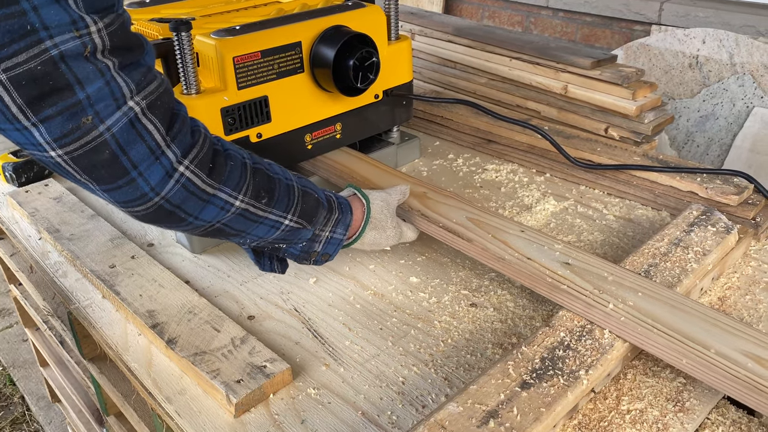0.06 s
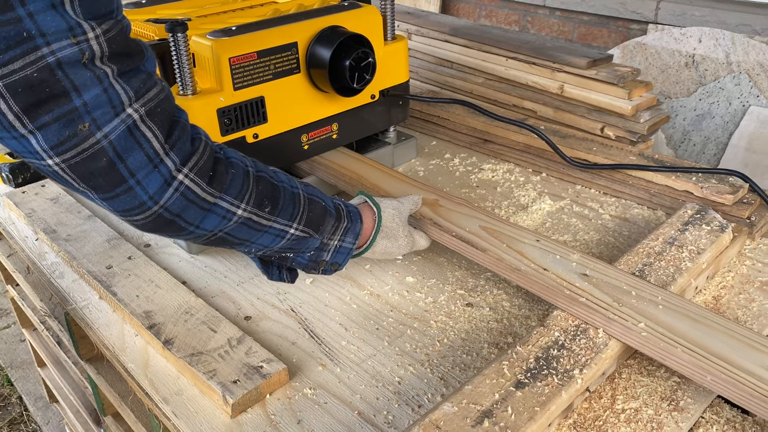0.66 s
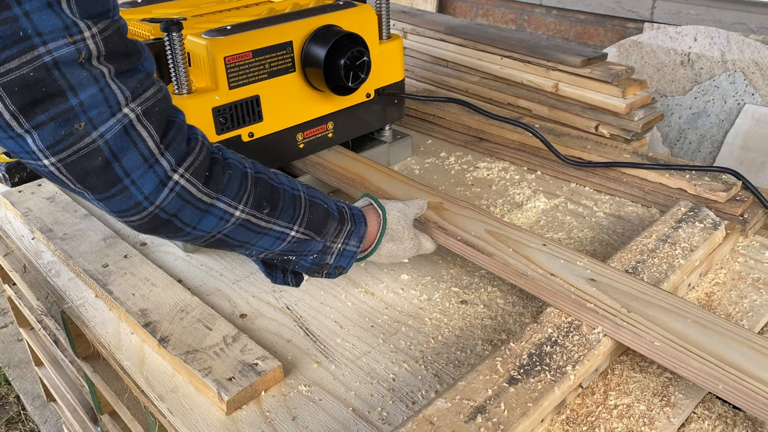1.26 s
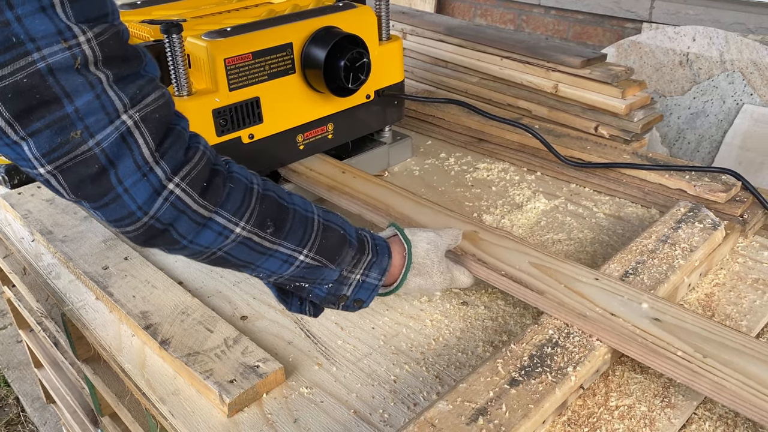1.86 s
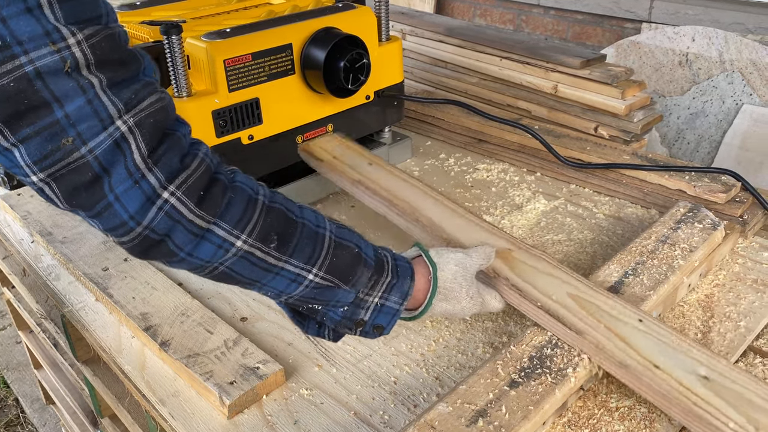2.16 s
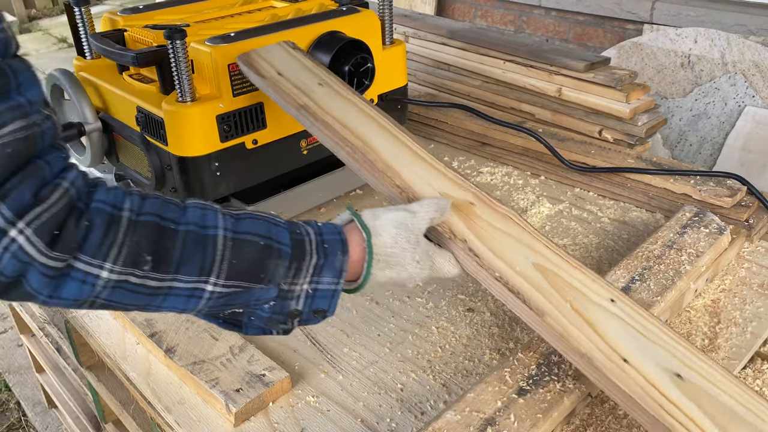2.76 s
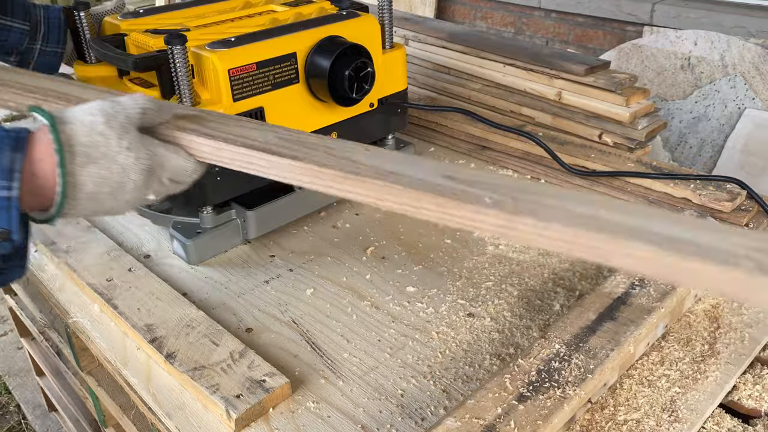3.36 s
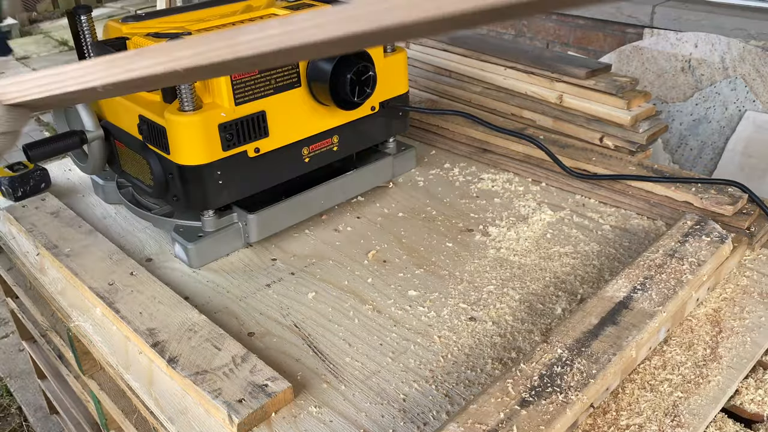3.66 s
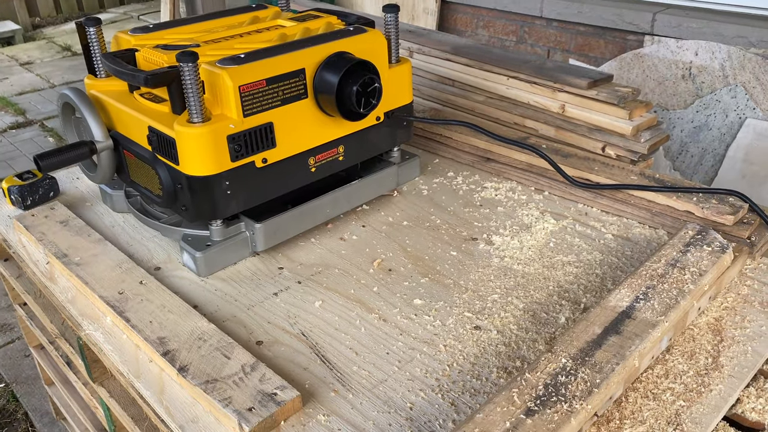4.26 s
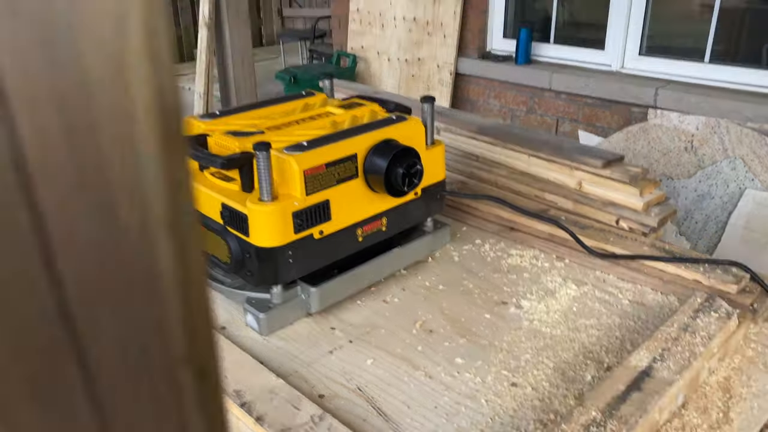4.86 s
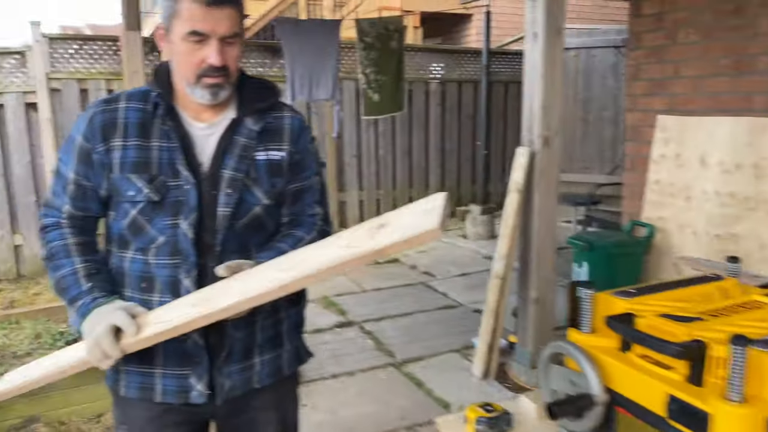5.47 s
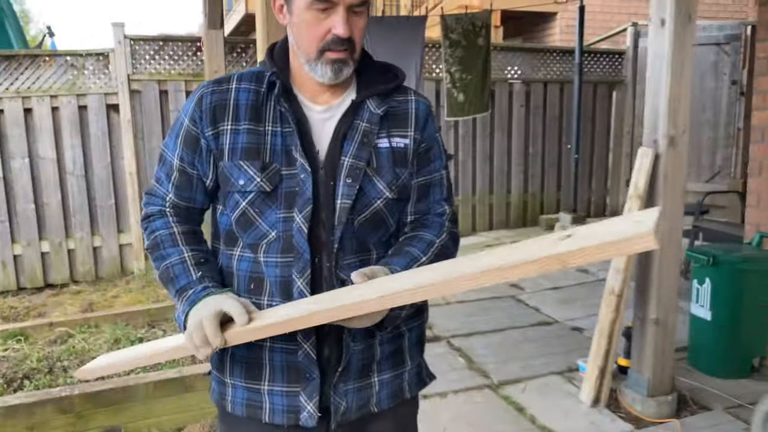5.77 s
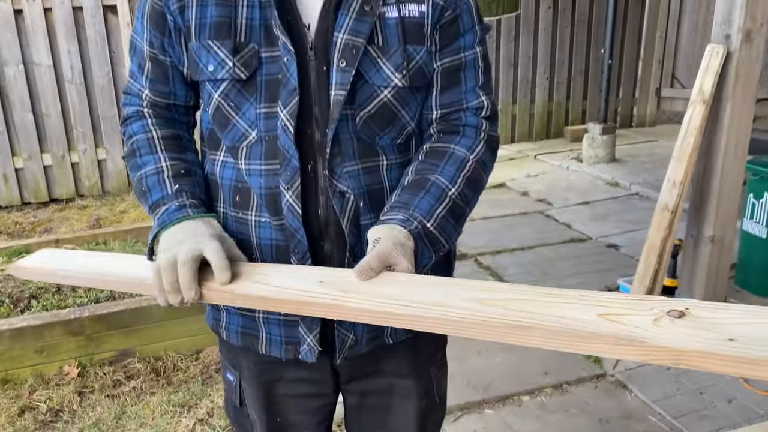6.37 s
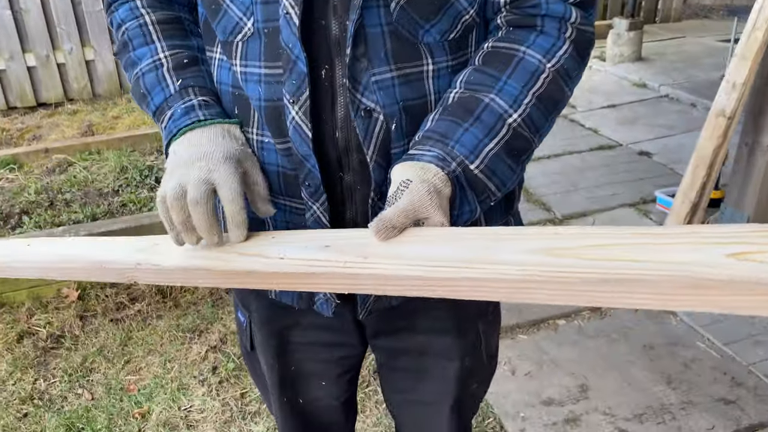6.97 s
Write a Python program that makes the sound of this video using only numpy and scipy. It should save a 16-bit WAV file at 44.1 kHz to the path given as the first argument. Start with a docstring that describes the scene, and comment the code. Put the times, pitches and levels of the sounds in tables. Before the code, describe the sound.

Close to the microphone, a thickness planer hums and whines over a loud roar of air while finishing a board, which rasps on its way out. The power is cut with a dull knock and the motor slides down in pitch over a few seconds. As it dies away the quiet yard comes through: a small bird chirping faintly, low rumble, soft bumps and light gloved touches on the board.

```python
"""A wood planer winds down

A thickness planer runs in a back yard as a board is drawn out, then is switched off and coasts to rest.
Its three-knife cutterhead drones, the belted motor and fan whine, and air roars through the ringing
housing. As it slows, the tones sink and the yard comes through: a low rumble, soft bumps, a glove
tapping and brushing the wood, and a small bird."""
import sys
import numpy as np
from scipy import signal
from scipy.fft import rfft, irfft, next_fast_len
from scipy.io import wavfile
from scipy.ndimage import map_coordinates

SR = 44100
rng = np.random.default_rng(int(sys.argv[2]) if len(sys.argv) > 2 else 0)


def file_out(sig):
    """Save sig as 16-bit WAV at sys.argv[1]."""
    # one column per channel
    cols = np.atleast_2d(sig).T
    # limit, then scale
    lim = np.clip(cols, -1, 1)
    pcm = np.round(lim * 32767).astype(np.int16)
    wavfile.write(sys.argv[1], SR, pcm)


N = 309120
TIME = np.arange(N) / SR
# Names ending in _AT are moments and those in _S are durations, both in seconds.
CUT_ENDS_AT, CUT_EASE_S = 1.3, 0.63  # the load comes off the knives
BOARD_OUT_AT, SWITCH_OFF_AT = 2.23, 3.272
TURN_AWAY_AT, TURN_S = 4.99, 0.72  # the microphone swings away from the machine
FULL_SPEED_HZ, BELT_RATIO = 140, 2.006  # cutterhead turns a second; motor turns per cutterhead turn


def amp(db):
    """Turn decibels into a gain."""
    return np.exp(np.asarray(db) * (np.log(10) / 20))

def unit(x):
    """Scale a signal to an average size (rms) of 1."""
    return x / np.sqrt(np.mean(np.abs(x) ** 2) + 1e-20)

def along(points, hz):
    """Read between (frequency, value) points, with octaves evenly spaced."""
    f, v = np.transpose(points)
    return np.interp(np.log(hz + 1), np.log(f + 1), v)

def ramp(at, length):
    """Rise from 0 to 1, passing halfway at the given moment."""
    return np.clip((TIME - at) / length + .5, 0, 1)

def swell(at, half_width):
    """Rise smoothly from 0 to 1 and back around a moment."""
    return np.exp(-((TIME - at) / half_width) ** 2)

def wobble(rate):
    """A smooth curve through `rate` random values a second."""
    coarse = np.arange(0, N + 16, 16)
    knots = rng.standard_normal(int(N * rate / SR) + 4)
    curve = map_coordinates(knots, [coarse * rate / SR], mode="nearest")
    return unit(np.interp(np.arange(N), coarse, curve))

def fuzzy(hz, width_hz):
    """A narrow band of noise around one pitch."""
    phase = 2 * np.pi * hz * TIME
    return unit(wobble(width_hz) * np.cos(phase) + wobble(width_hz) * np.sin(phase))

def filtered(x, response):
    """Scale each frequency in x by response(hz)."""
    size = next_fast_len(N + 8192)
    return irfft(rfft(x, size) * response(np.fft.rfftfreq(size, 1 / SR)), size)[..., :N]

def stereo(lean_db, lead):
    """Left and right gains: the left is lean_db louder and `lead` radians ahead."""
    half = amp(lean_db / 2) * np.exp(.5j * lead)
    return np.array([half, 1 / half]).reshape(2, -1)

def tone(cycles, rough, lean_db=0, lead=0, flutter_hz=30):
    """A stereo sine wave that moving air makes flutter."""
    flutter = rough * (wobble(flutter_hz) + 1j * wobble(flutter_hz))
    wave = unit(1 + flutter) * np.exp(2j * np.pi * (cycles + rng.random()))
    return np.sqrt(2) * np.real(wave * stereo(lean_db, lead))

LIKENESS = [(250, 0.77), (600, 0.46), (1000, 0.66), (1350, 0.28), (1700, 0.88), (2800, 0.43), (4000, 0.57),
            (6800, 1), (8200, 1), (15000, 0.062)]  # how alike left and right are: f/Hz, likeness/0-1
LEFT_LOUDER = [(100, -4.5), (500, -3), (1000, 3.5), (1250, 5.5), (1600, -1), (3400, -3), (4200, 8.5),
               (4800, 6), (7000, 1.5), (8000, 0)]  # how much louder the machine is on the left: f/Hz, level/dB
LEFT_AHEAD = [(100, -1), (420, 0.5), (550, 0.83), (1200, 1.73), (1450, 0.26), (2100, 0.62), (3200, 1.5),
              (3900, 3), (4500, 1.5), (6200, 1), (7600, 2), (8700, 4.5), (10500, 1.5), (11600, -7),
              (13000, -8.5), (15600, 5.5)]  # how far its waves are ahead on the left: f/Hz, phase/rad
def noise(spectrum, aimed=True):
    """Stereo noise shaped by a spectrum; if aimed, it comes from the machine's direction."""
    size = next_fast_len(N, real=True)
    hz = np.fft.rfftfreq(size, 1 / SR)
    alike = np.clip(along(LIKENESS, hz), 0, 1)
    mid, side = rfft(rng.standard_normal((2, size))) * np.sqrt([1 + alike, 1 - alike])
    direction = stereo(aimed * along(LEFT_LOUDER, hz), aimed * along(LEFT_AHEAD, hz))
    colour = amp(along(spectrum, hz)) * direction
    pair = irfft(np.array([mid + side, mid - side]) * colour, size)[:, :N]
    return pair / np.std(pair.mean(0))


RUMBLE_SPECTRUM = [(25, -25.5), (60, 1.5), (110, -4), (200, -12.5), (350, -19.5), (650, -21.5),
                   (940, -22.5), (1300, -27), (2000, -30), (3000, -48), (6000, -59), (12000, -62.5),
                   (16000, -76.5)]  # low outdoor rumble: f/Hz, level/dB
ROAD_SPECTRUM = [(500, -33.5), (780, -3.5), (940, 1), (1100, -9), (1300, -15.5), (1700, -16), (2600, -38.5)]  # hollow rush, like far-off tyres: f/Hz, level/dB
def yard():
    """The rumble swells as the microphone is carried round; a distant rush draws nearer."""
    rumble = amp(-59 + 8 * swell(5.43, 0.87) + 0.81 * wobble(6.8)) * noise(RUMBLE_SPECTRUM, aimed=False)
    road = amp(-72.5 + 5.5 * ramp(6.2, .9) + 1.2 * wobble(11)) * noise(ROAD_SPECTRUM, aimed=False)
    return rumble + road

# Chirps, slurs and trills: t/s, length/s, first f/Hz, last f/Hz, level/dB, trill/0-1
BIRD_NOTES = [(4.935, .035, 6200, 5840, -63, .3), (4.982, 0.04, 6380, 6560, -57, .25),
              (5.632, .024, 6250, 5400, -71.5, 0), (5.656, .024, 5340, 5650, -70.5, 0),
              (5.83, .115, 5630, 5700, -75.5, .6), (5.96, .065, 8450, 7850, -86, .5),
              (6.428, 0.02, 5950, 5470, -69, 0.1), (6.45, .026, 5500, 5780, -74, 0.05),
              (6.478, 0.121, 5860, 5830, -79, .55), (6.598, 0.17, 5800, 5850, -75, 0.8),
              (6.785, .05, 8200, 8250, -84, .1), (6.835, .04, 8300, 7800, -86, .5)]
def bird(trill_hz=112, swing_hz=110, rasp_hz=130, edge_s=.015, echo_s=.15):
    """Thin gliding notes echo off the fences; in a trill, pitch and loudness pulse unevenly."""
    beat = 2 * np.pi * np.cumsum(trill_hz * (1 + .17 * wobble(60))) / SR
    swing = swing_hz * (np.sin(beat) + wobble(900))
    rasp = rasp_hz * wobble(1200)
    song = 0
    for at, length, first_hz, last_hz, db, trill in BIRD_NOTES:
        hz = first_hz + (last_hz - first_hz) * ramp(at + length / 2, length) + trill * swing + rasp
        sounding = ramp(at, edge_s) * (1 - ramp(at + length, edge_s))
        pulses = 1 - trill * (1 + np.cos(beat)) / 2
        song += sounding * pulses * amp(db) * np.sqrt(2) * np.sin(2 * np.pi * np.cumsum(hz) / SR)
    t = TIME[:SR // 4]
    echo = rng.standard_normal((2, len(t))) * amp(-60 * t / echo_s)
    echo /= np.linalg.norm(echo[0])
    return song + amp(-7) * signal.fftconvolve(song[None], echo, axes=1)[:, :N]

# The switch, then knocks near the microphone: t/s, level/dB, f/Hz, time to fade 60 dB/s
THUDS = [(3.277, -9, 255, 0.041), (5.502, -26.5, 58, 0.14), (5.535, -30.5, 69.5, 0.3),
         (5.587, -21.5, 123, 0.049)]
def thuds(attack_s=0.01):
    """Each soft knock is one low tone that dies quickly."""
    out = 0
    for at, db, hz, fade_s in THUDS:
        t = np.maximum(TIME - at, 0)
        out += amp(db - 60 * t / fade_s) * (1 - np.exp(-t / attack_s)) * np.sin(2 * np.pi * hz * t)
    return out

GLOVE_STROKES = [(5.78, -76, .1), (6.13, -77, .22), (6.41, -71.5, 0.055), (6.6, -82, .13),
                 (6.989, -84, 0.033)]  # brushes along the board: t/s, level/dB, half width/s
GLOVE_SPECTRUM = [(500, -20.5), (1000, -0.5), (1500, 2), (2200, -10), (4000, -11), (8500, -18),
                  (12000, -23), (16000, -48)]  # cloth on wood: f/Hz, level/dB
def glove():
    """Cloth rubs the planed wood in short, scratchy strokes."""
    pressure = sum(amp(db) * swell(at, width) for at, db, width in GLOVE_STROKES)
    return pressure * amp(2.5 * wobble(150)) * noise(GLOVE_SPECTRUM, aimed=False)

FINGER_TAPS = [(6.372, -53), (6.436, -63)]  # fingers landing: t/s, relative level/dB
BOARD_NOTES = [(820, -1, .05), (1330, -4, .04), (1520, 0, .04), (1800, -5, .03), (3900, -12, .015)]  # how the board rings: f/Hz, relative level/dB, time to fade 60 dB/s
def taps(attack_s=.001):
    """Gloved fingers set the board ringing with small woody ticks."""
    out, t = np.zeros(N + SR), TIME[:SR // 8]
    for at, tap_db in FINGER_TAPS:
        ring = sum(amp(db - 60 * t / fade_s) * np.sin(2 * np.pi * (hz * t + rng.random()))
                   for hz, db, fade_s in BOARD_NOTES)
        out[round(at * SR):][:len(t)] += amp(tap_db - 3) * (1 - np.exp(-t / attack_s)) * ring
    return out[:N]

BOARD_SCRAPES = [(2.118, -42.5, 0.027), (2.298, -30, 0.05), (2.43, -36.5, .05)]  # the board's end dragging: t/s, level/dB, half width/s
SCRAPE_SPECTRUM = [(1200, -28.5), (1700, -3.5), (2100, -14.5), (2600, 1), (3250, 1), (3600, -15.5),
                   (4500, -14), (6000, -28)]  # wood on the planer's bed: f/Hz, level/dB
def scrape():
    """The board's end rasps over the bed as it comes free."""
    pressure = sum(amp(db) * swell(at, width) for at, db, width in BOARD_SCRAPES)
    grit = unit(amp(1.5 * wobble(500)))
    return pressure * grit * noise(SCRAPE_SPECTRUM)

FRAME_NOTES = [(278.7, 8, -4.5), (409.6, 8.3, -10.5), (615, 12, -17.5), (990, 130, -18)]  # how the frame rings: f/Hz, width/Hz, relative level/dB
def frame(fade_at=5.13, fade_db_per_s=14.5):
    """The frame rings on, then fades in the last turns, when a hollow note swells briefly."""
    level_db = -49.5 - fade_db_per_s * np.maximum(TIME - fade_at, 0)
    hollow = amp(-62.5) * swell(5.7, .09) * fuzzy(hz=1000, width_hz=110)
    return hollow + amp(level_db) * sum(amp(db) * fuzzy(hz, width) for hz, width, db in FRAME_NOTES)

WHIRR_SPECTRUM = [(150, -24), (250, 0), (400, -1), (530, 4.5), (660, -9), (800, 0), (1000, -23),
                  (1500, -37)]  # belt and bearings: f/Hz, level/dB
def whirr(turns):
    """The slow shafts rumble in their bearings, pulsing once a turn."""
    pulses = 1 + 0.32 * np.cos(2 * np.pi * turns)
    return amp(-55.5) * swell(5.05, 0.65) * pulses * noise(WHIRR_SPECTRUM, aimed=False)

# The air's roar, rush and hiss: base level/dB, gain with the board out/dB,
# loss per halving of the flow/dB, loss on turning away/dB
AIR_LAYERS = [(-35, 0.4, 15.5, 11), (-32, 0, 21, 8), (-35.5, 0, 30.5, 1.5)]
def air_levels(speed_hz, swirl_hz=34.8):
    """Air noise sinks with the flow, treble fastest, and drops again as the shafts stop."""
    halvings = np.log2((FULL_SPEED_HZ + swirl_hz) / (speed_hz + swirl_hz))  # some air keeps swirling
    opened, away = ramp(BOARD_OUT_AT, 0.44), ramp(TURN_AWAY_AT, TURN_S)
    rest_db = -14 * ramp(6.75, .15)
    roar_db, rush_db, hiss_db = [base_db + open_db * opened - slow_db * halvings - away_db * away + rest_db
                                 for base_db, open_db, slow_db, away_db in AIR_LAYERS]
    shade = ramp(5.09, .2) - ramp(5.39, 0.49)  # a wooden post passes in front of the microphone
    lift_db = 2.5 * swell(3.1, 0.36)  # more hiss as the board is lifted clear
    return roar_db, rush_db - 2 * shade, hiss_db + lift_db - 16.5 * shade

ROAR_SPECTRUM = [(25, -37), (60, -15.5), (110, -7), (180, -9.5), (240, -4), (350, -4.5), (490, -5.5),
                 (600, 0), (900, 1), (1200, 2), (1420, -10), (1650, -2), (2100, -15), (3000, -35.5)]  # low air noise: f/Hz, level/dB
RUSH_SPECTRUM = [(1300, -45.5), (2000, -8), (2700, 3.5), (3200, -2), (3600, 0.5), (4400, -0.5),
                 (5400, -5.5), (6700, -4.5), (7600, -8), (9000, -21), (12000, -70.5)]  # middle air noise: f/Hz, level/dB
HISS_SPECTRUM = [(4000, -33.5), (7000, 1.5), (8300, -13.5), (9500, 6), (10700, 3.5), (12000, -3.5),
                 (13300, -20.5), (14500, -19), (15700, -9), (17000, -42.5)]  # high hiss, with hollows near 8.3 and 13.3 kHz: f/Hz, level/dB
# Where the housing rings: f/Hz, width/Hz, gain with the board in/dB, gain with it out/dB
HOUSING_PEAKS = [(720, 100, -1.5, 2), (1067, 57, 3.5, 1.5), (1731, 52, -2, 9.5), (2146, 247, 14, 5),
                 (2640, 130, 4, 2.5), (2847, 67, 7, 10), (3040, 31, -2, 5), (3096, 28, -3, 7.5),
                 (3240, 85, -0.5, 11), (3530, 44, -5, -10), (3612, 55, 9, 2.5), (3690, 110, -6.5, -5),
                 (4030, 110, -1.5, 4), (4240, 36, 0.5, 4), (4620, 160, 3, -1), (5130, 47, -6, -2.5)]
def air(turns, roar_db, rush_db, hiss_db):
    """Fan and knives churn the air; the housing rings differently once the board is out."""
    angle = 2 * np.pi * turns
    puffs = 1 + 0.085 * np.cos(angle) + 0.093 * np.cos(3 * angle)  # once a turn and once a knife
    roar = amp(roar_db + 3.5 + 0.77 * wobble(12)) * puffs * noise(ROAR_SPECTRUM)
    rush = amp(rush_db - 1.0 + 0.65 * wobble(14)) * noise(RUSH_SPECTRUM)
    hiss = amp(hiss_db + 1.5 + 0.82 * wobble(15)) * noise(HISS_SPECTRUM)
    flow = roar + rush
    centre, width, blocked_db, open_db = np.transpose(HOUSING_PEAKS)
    peaks = lambda hz: 1 / (1 + (2 * (hz[:, None] - centre) / width) ** 2)
    blocked = filtered(flow, lambda hz: amp(peaks(hz) @ blocked_db))
    opened = filtered(flow, lambda hz: amp(peaks(hz) @ open_db))
    ringing = blocked + (opened - blocked) * ramp(BOARD_OUT_AT, 0.76)
    away = 0.75 * ramp(5.54, 0.39)  # the microphone swings off the housing's mouth
    return ringing + (flow - ringing) * away + hiss

CASING_GAIN = [(200, -8), (250, -4), (277, 11), (310, -4), (350, 3), (400, -4), (620, 1), (1060, 1),
               (1250, 0), (1420, -12), (1730, -3), (1920, -15), (2160, -3), (2330, -10), (2480, -2),
               (2650, 2), (2780, 2.5), (2950, -1.5), (3230, -1), (3500, -13), (3700, -6), (3950, -.5),
               (4250, 3), (4430, 0), (4680, -12), (5050, -7), (5450, -13), (5850, -8), (6250, -14),
               (6740, -7), (8000, -24)]  # how well the casing gives off sound: f/Hz, gain/dB
def casing(sound):
    """Falling pitches flare as they slide through the casing's peaks."""
    return filtered(sound, lambda hz: amp(along(CASING_GAIN, hz)))

# Noise bands: centre/cycles a turn, width/cycles a turn, powered gain/dB, coasting gain/dB
WAKE_BANDS = [(15.26, .9, -6, -11), (31.1, 2.2, -14.5, -8), (40.6, 2.4, -21.5, -7), (53, 6, -28.5, -9.5),
              (62, 4, -30, -12.5)]
def wakes(turns, coasting, rush_db, steps_per_turn=256):
    """Blades leave uneven air behind them: bands of noise that sink and narrow with the speed."""
    count = 2 ** 18
    multiples = np.fft.rfftfreq(count, 1 / steps_per_turn)
    out = 0
    for centre, width, powered_db, coast_db in WAKE_BANDS:
        shape = np.exp(-2 * ((multiples - centre) / width) ** 2)
        band = unit(irfft(rfft(rng.standard_normal((2, count))) * shape))
        mid, side = [np.interp(turns * steps_per_turn, np.arange(count), b) for b in band]
        db = rush_db + powered_db + (coast_db - powered_db) * coasting
        out += amp(db) * np.array([mid + 0.91 * side, mid - 0.66 * side])
    return casing(out)

def motor(turns, coasting, hiss_db, hum_hz=120):
    """While powered, the motor hums at twice the mains rate and its brushes sing high above."""
    hum = amp(-46.5) * tone(hum_hz * TIME, rough=.05)
    brush_db = hiss_db - 18.5 + 6 * ramp(BOARD_OUT_AT, .6)
    brushes = amp(brush_db) * tone(42 * turns, rough=.25, lead=.8)
    return (1 - coasting) * (hum + brushes)

# Fan and rotor tones: multiple of motor speed, base level/dB, cutting gain/dB, coasting gain/dB,
# loss per halving of speed/dB, loss on turning away/dB, roughness/0-1
MOTOR_WHISTLES = [(16, -54, 11.5, 8, 6.5, 12, .25), (21, -47, 0, 4, 8, 17, .45),
                  (24, -44, -8, 0, 19, 10, .5), (32, -67, 0, 0, 0, -2, .9)]
def whistles(turns, cutting, coasting):
    """Thin, wavering overtones of the motor slide down once the power is off."""
    halvings = np.log2(BELT_RATIO * FULL_SPEED_HZ / (np.gradient(turns) * SR))
    away = ramp(TURN_AWAY_AT, TURN_S)
    out = 0
    for multiple, base_db, cut_db, coast_db, slow_db, away_db, rough in MOTOR_WHISTLES:
        db = base_db + cut_db * cutting + (coast_db + 2 * wobble(14)) * coasting
        db -= slow_db * halvings + away_db * away
        out += amp(db) * tone(multiple * turns, rough, lean_db=4, lead=.8, flutter_hz=90)
    return out

# Weak tones: multiple of cutterhead speed, powered gain/dB, coasting gain/dB, last turns gain/dB
KNIFE_OVERTONES = [(4, -22, -12, -12), (5, -14, -9, -3), (7, -30, -20, -3), (9, -8.5, -2.5, 0),
                   (12, -11, -11, 0)]
def knife_overtones(turns, coasting, roar_db):
    """Faint knife tones follow the roar's level and waver as they cross small panel resonances."""
    out = 0
    for multiple, powered_db, coast_db, last_db in KNIFE_OVERTONES:
        ripple_db = 3 * wobble(9)
        db = roar_db + powered_db + (coast_db + ripple_db - powered_db) * coasting
        db += (last_db - coast_db) * ramp(5.05, .35)
        out += amp(db) * tone(multiple * turns, rough=.3, lean_db=3, lead=.55, flutter_hz=45)
    return out

# Unbalance and its octave, passing knives and their octave, fan blades: shaft, multiple of its speed,
# base level/dB, cutting gain/dB, coasting gain/dB, loss per halving of speed/dB, roughness/0-1,
# left louder/dB, left ahead/rad
DRONE_TONES = [("head", 1, -37.5, 2.9, 0, 25, 0.031, -3, -0.089),
               ("head", 2, -37, -3, -8, 3.6, 0.034, -1.8, 0.28),
               ("head", 3, -28.5, 2.5, 0, 13.6, 0.067, -1.7, -0.44),
               ("head", 6, -32, -1.5, 0, 18.9, 0.12, 1.5, 1.06),
               ("motor", 8, -34.5, 2, 1.3, 12, 0.19, -4.5, 0.34)]
PANEL_PEAKS = [(101, 9, 7.5), (109.5, 4.9, -10), (116, 9, 8.5), (128.2, 18.3, 11), (183.2, 46.5, 10.5),
               (198, 7.6, -5), (225, 14, 8), (265.2, 24, 8), (279.3, 14, 2), (303, 20, 5), (317, 9, -10),
               (324.3, 11, 9), (354.3, 35, 10), (613, 218, 8.5), (675, 25, -5.5), (774, 20, -14.5),
               (1100, 26, -11), (1200, 260, 3.5), (1395, 200, -21), (1734, 150, 9), (1867, 73, -8.5),
               (1950, 40, -7), (2140, 98, 5.5)]  # pitches the panels boost or swallow: f/Hz, width/Hz, gain/dB
TONE_FLARES = [(.38, 1, 0.15, -9.5), (.52, 4, 0.13, 2.5), (1.34, 2, 0.096, -20), (1.35, 3, 0.16, 3.5),
               (2.5, 4, 0.16, -4), (3.13, 4, 0.086, -22.5), (3.23, 2, 0.041, -10), (3.29, 1, 0.056, 9.5),
               (3.33, 4, 0.037, 4), (4.08, 1, 0.24, -12.5), (4.74, 1, 0.0074, -15), (5.05, 1, 0.073, 6)]  # one tone dips or flares: t/s, row of DRONE_TONES, half width/s, gain/dB
def drone(speed_hz, turns, cutting, coasting):
    """The shafts' strong tones change with load, speed and panel ringing, and roughen as they slow."""
    halvings = np.log2(FULL_SPEED_HZ / speed_hz)
    away_db = 11.5 * ramp(TURN_AWAY_AT, TURN_S)
    roughening = 1 + ramp(3.6, 0.91)
    grid_hz = np.arange(SR // 16)
    panels_db = sum(db / (1 + (2 * (grid_hz - hz) / width) ** 2) for hz, width, db in PANEL_PEAKS)
    out = 0
    for row, settings in enumerate(DRONE_TONES):
        shaft, multiple, base_db, cut_db, coast_db, slow_db, rough, lean_db, lead = settings
        per_turn = multiple * (BELT_RATIO if shaft == "motor" else 1)
        db = base_db + cut_db * cutting + coast_db * coasting - slow_db * halvings - away_db
        db += np.interp(per_turn * speed_hz, grid_hz, panels_db)
        for at, flare_row, width, flare_db in TONE_FLARES:
            if flare_row == row:
                db += flare_db / (1 + ((TIME - at) / width) ** 2)
        out += amp(db) * tone(per_turn * turns, rough * roughening, lean_db, lead)
    return out

POWERED_SPEED = [(0, 136.15), (.3, 136.9), (.9, 137.8), (1.3, 138.93), (1.6, 139.3), (2.2, 139.76),
                 (3.27, 140)]  # the cutterhead picks up as the cut ends: t/s, turning rate/Hz
def cutterhead_speed(friction_hz_per_s=27.77, drag_hz=103.4):
    """With the power off, steady friction and air drag brake the shaft; they are equal at drag_hz."""
    powered_hz = np.interp(TIME, *np.transpose(POWERED_SPEED))
    coasted_s = np.maximum(TIME - SWITCH_OFF_AT, 0)
    angle = np.arctan(powered_hz / drag_hz) - friction_hz_per_s / drag_hz * coasted_s
    return drag_hz * np.tan(np.maximum(angle, 1e-3))


def scene():
    """The cutterhead's speed drives the planer's tones and air; the yard lies underneath."""
    speed_hz = cutterhead_speed()
    turns = np.cumsum(speed_hz) / SR
    motor_turns = BELT_RATIO * turns
    cutting, coasting = 1 - ramp(CUT_ENDS_AT, CUT_EASE_S), ramp(SWITCH_OFF_AT, 0.13)
    roar_db, rush_db, hiss_db = air_levels(speed_hz)
    strong = drone(speed_hz, turns, cutting, coasting)
    weak = knife_overtones(turns, coasting, roar_db) + whistles(motor_turns, cutting, coasting)
    fade_out = 1 - ramp(5.6, 0.51)
    tones = (strong + casing(weak)) * fade_out + motor(motor_turns, coasting, hiss_db)
    wind = air(turns, roar_db, rush_db, hiss_db) + wakes(turns, coasting, rush_db)
    planer = tones + wind + whirr(turns) + scrape() + frame()
    return planer + thuds() + glove() + taps() + yard() + bird()

def record(dry):
    """Cut off the very highest treble."""
    return filtered(dry, lambda hz: hz < 15800)


dry = scene()
out = record(dry)
file_out(out)
```